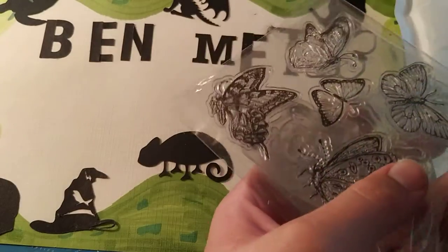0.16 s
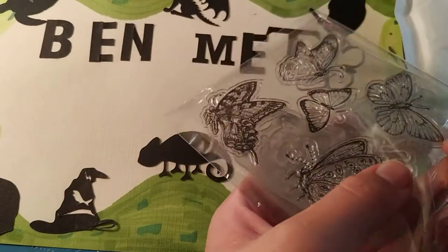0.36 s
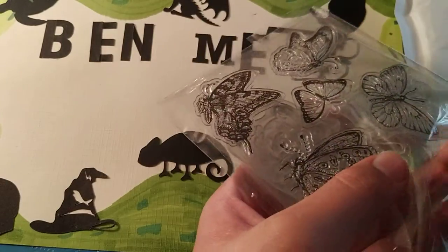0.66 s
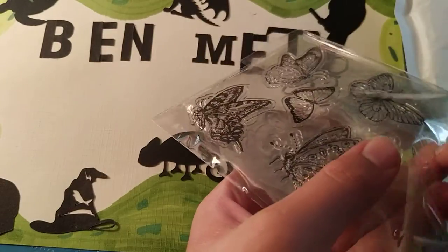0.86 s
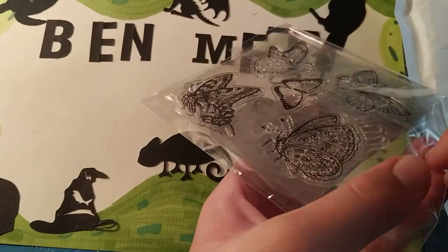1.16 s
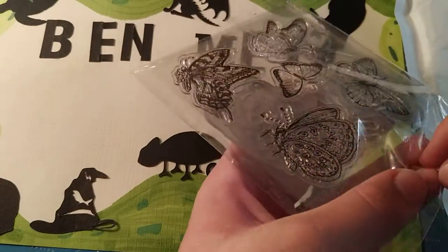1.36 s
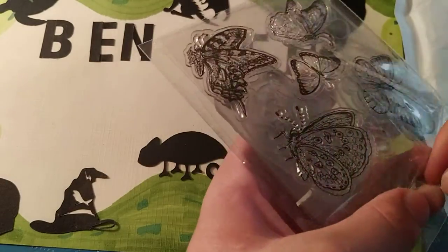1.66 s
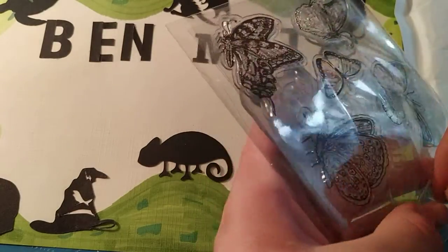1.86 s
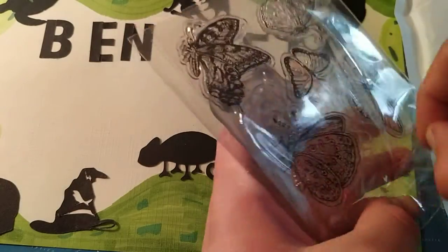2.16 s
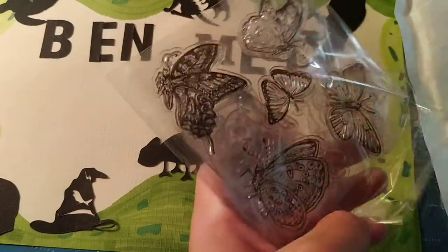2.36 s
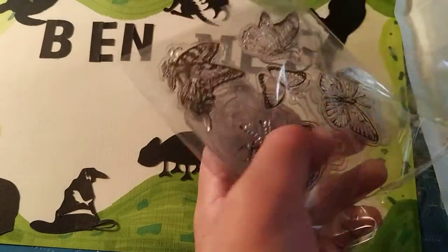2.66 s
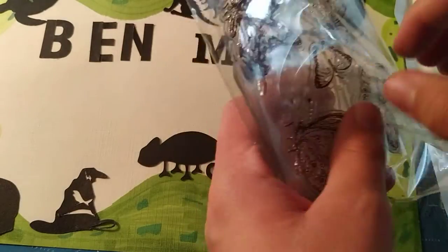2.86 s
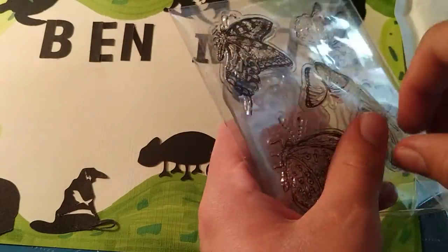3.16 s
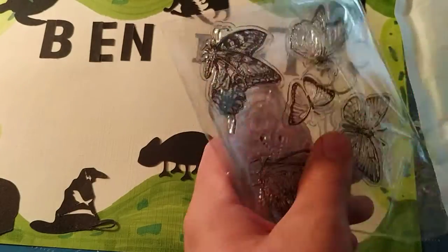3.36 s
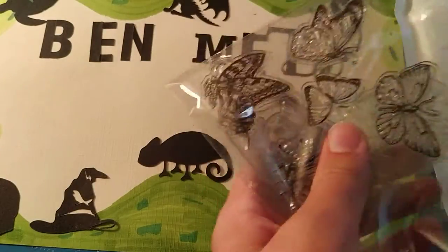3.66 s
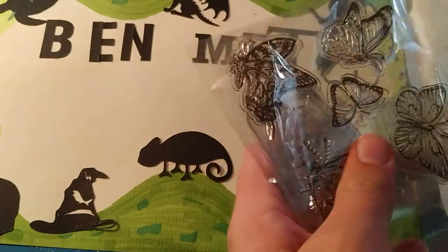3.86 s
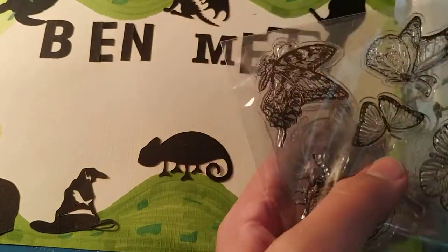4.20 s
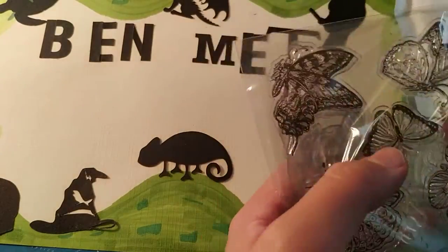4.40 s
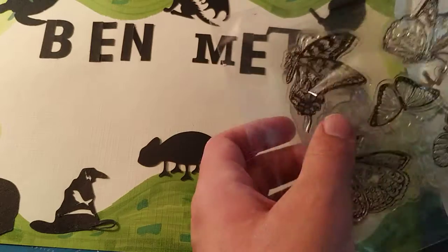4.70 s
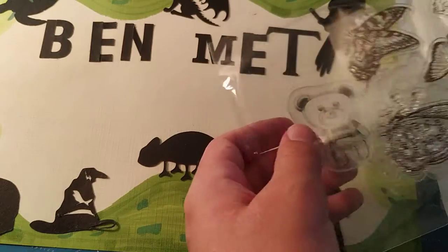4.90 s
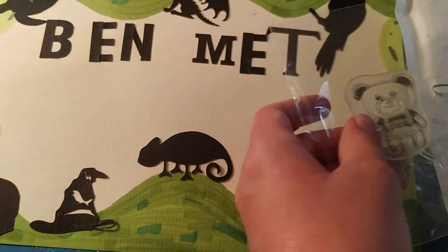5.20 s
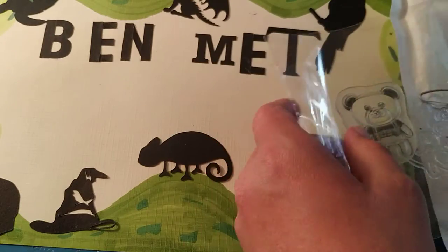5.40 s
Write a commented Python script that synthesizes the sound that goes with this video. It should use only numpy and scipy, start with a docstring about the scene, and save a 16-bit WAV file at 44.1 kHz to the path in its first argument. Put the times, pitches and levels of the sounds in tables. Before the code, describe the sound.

Close, bright crinkling comes from a plastic sleeve and the thin sheets inside it as they are handled. It starts with light, separate snaps, eases for a moment, then builds into a busy run of crackles and crunches, with hiss as the sheets slide. Fingers rustle and the bending plastic gives soft puffs of air before the crackle thins. The room is quiet, with only a short echo.

```python
"""Crinkling plastic sheets

Two hands flex thin clear sheets in a crisp sleeve, close under a two-port microphone in a quiet room.
Creases snap through as sharp clicks over fine crackle and dense crunches. The sheets hiss as they slide
and puff air as they flex; fingers rustle. Table and walls answer with early echoes and a short tail."""
import sys
import numpy as np
from scipy import signal
from scipy.fft import rfft, irfft
from scipy.io import wavfile

SR = 44100
rng = np.random.default_rng(int(sys.argv[2]) if len(sys.argv) > 2 else 0)


def log_audio(samples):
    """Write samples as a 16-bit WAV file to the path given in sys.argv[1]."""
    # one column per channel
    frames = np.atleast_2d(samples).T
    # limit to full scale, then quantise
    limited = np.clip(frames, -1, 1)
    pcm = np.round(limited * 32767).astype(np.int16)
    wavfile.write(sys.argv[1], SR, pcm)


N = 244346


def from_db(db):
    return 10 ** (np.asarray(db) / 20)


def unit_rms(x):
    return x / np.sqrt(np.mean(x ** 2) + 1e-20)


def butter(x, hz, kind, order=2):
    return signal.sosfilt(signal.butter(order, hz, kind, fs=SR, output="sos"), x)


def resonance(x, hz, width):
    """Two-pole band with gain 1 at its peak."""
    r = np.exp(-np.pi * width / SR)
    poles = [1, -2 * r * np.cos(2 * np.pi * hz / SR), r * r]
    return signal.lfilter(np.array([1, 0, -1]) * (1 - r * r) / 2, poles, x)


def panned(x, pan_db):
    """Two channels from a left-minus-right level gap."""
    return x * from_db(np.multiply.outer([.5, -.5], pan_db))


def place(rows, times, lead):
    """Lay each row on one track, starting `lead` samples before its time."""
    at = np.round(times * SR).astype(int) - lead + np.arange(rows.shape[1])
    track = np.zeros(N)
    np.add.at(track, np.clip(at, 0, N - 1), rows)
    return track


def fader(table, column):
    """Gain that rides one dB column of a table over time."""
    points = np.transpose(table)
    return from_db(np.interp(np.arange(N) / SR, points[0], points[column]))


# Room tone spectrum: (frequency [Hz], relative density [dB])
ROOM_TONE = [(20, 12.5), (40, 4.5), (100, -4), (250, -12.5), (900, -20), (3000, -22.5), (8000, -43),
             (16000, -51)]


def room_tone(level_db=-59, likeness=0.62, alike_below_hz=97):
    """Steady room noise, alike in both ports only in the bass."""
    hz = np.maximum(np.arange(N // 2 + 1) * SR / N, 1)
    points_hz, points_db = np.transpose(ROOM_TONE)
    shape = from_db(np.interp(np.log(hz), np.log(points_hz), points_db))
    alike = likeness / (1 + (hz / alike_below_hz) ** 2)
    mid, side = rfft(rng.standard_normal((2, N))) * shape
    both = np.sqrt(1 + alike) * mid + np.sqrt(1 - alike) * side * [[1], [-1]]
    return from_db(level_db) * unit_rms(irfft(both, N))


def room_tail(x, send_db=-14, t60_s=0.27):
    """The walls return a smooth tail, thin in the bass; each port hears its own."""
    t = np.arange(SR // 2) / SR
    tail = rng.standard_normal((2, len(t))) * from_db(-60 * t / t60_s) * np.minimum(t / 0.01, 1)
    tail = from_db(send_db) * unit_rms(tail) / np.sqrt(len(t))
    return signal.fftconvolve(x, butter(tail, 500, "high", order=1), axes=1)[:, :N]


# Weight of the shifting grip: (time [s], level [dB])
GRIP_RUMBLE = [(0.0, -92), (3.2, -84), (3.55, -60), (4.0, -58.5), (4.5, -61), (4.85, -63), (5.0, -67),
               (5.54, -58.5)]


def grip_rumble(friction, clumps):
    """Hands shifting their grip rumble below 90 Hz."""
    steadier = friction * from_db(-2.5 * clumps)
    return unit_rms(butter(steadier, [28, 90], "band")) * fader(GRIP_RUMBLE, 1)


# Faders of the handling bed, before trims: (time [s], crackle [dB], hiss [dB], rustle [dB])
HANDLING_BED = [(0.0, -43.5, -60.5, -61), (0.52, -67, -66, -68.5), (0.85, -48.5, -68, -65),
                (1.39, -91, -68.5, -68), (1.53, -79, -74.5, -90), (1.87, -59.5, -77, -87),
                (2.04, -52.5, -73, -77), (2.08, -40, -65, -78), (2.36, -35.5, -45, -55),
                (2.64, -40, -59.5, -69), (2.9, -43.5, -60, -58), (3.16, -45, -53, -61),
                (3.36, -41.5, -57, -64), (3.55, -32.5, -50, -51), (3.86, -48.5, -49, -52.5),
                (4.06, -39, -54.5, -51), (4.72, -48, -43.5, -54.5), (5.0, -38, -54, -58),
                (5.1, -44.5, -51, -67), (5.28, -40.5, -50.5, -56), (5.42, -60, -53, -54),
                (5.54, -65, -52, -59.5)]


def finger_rustle(friction, trim_db=-4):
    """Fingers rub the plastic with a low rustle."""
    return unit_rms(butter(friction, [120, 450], "band")) * fader(HANDLING_BED, 3) * from_db(trim_db)


def sliding_hiss(body_db=3):
    """Sheets slide over each other with a hiss; returns edge and body feeds."""
    hiss = rng.standard_normal((2, N)) * fader(HANDLING_BED, 2)
    return hiss, hiss[0] * from_db(body_db)


def crackle(clumps, base_per_s=900, spread_db=3, edge_db=-11, body_db=-12):
    """Countless small creases tick at random, in clumps; returns edge and body feeds."""
    fires = rng.random(N) < base_per_s * from_db(4 * clumps) / SR
    sizes = from_db(spread_db * np.minimum(rng.exponential(1, N), 4)) * rng.choice([-1, 1], N)
    ticks = unit_rms(fires * sizes) * fader(HANDLING_BED, 1)
    return panned(ticks * from_db(edge_db), rng.uniform(-12, 12, N)), ticks * from_db(body_db)


# Air shoved at the ports: (centre time [s], relative level [dB], pitch [Hz], half length [cycles])
AIR_PUFFS = [(0.196, -49.5, 288, 1.2), (0.953, -44, 330, 0.43), (1.036, -47, 183, 0.63),
             (2.36, -46.5, 308, 1.7), (2.39, -55, 140, 0.88), (2.748, -50, 221, 0.62),
             (2.863, -40.5, 210, 0.39), (3.386, -41, 278, 0.84), (3.43, -41, 240, 0.99),
             (3.604, -33, 76, 0.28), (3.712, -45.5, 97, 0.58), (3.788, -49, 55, 0.4),
             (3.91, -47, 129, 0.54), (3.956, -46, 205, 0.84), (4.028, -45.5, 86, 0.47),
             (4.1, -53, 70, 0.52), (4.135, -34, 70.6, 0.2), (4.259, -46, 59, 0.49), (4.373, -39, 65, 0.39),
             (4.505, -50.5, 111, 1.8), (4.554, -49, 236, 1.0), (4.731, -52, 204, 1.9),
             (4.779, -50.5, 50, 1.1), (4.853, -45, 60.6, 0.43), (5.344, -51, 60.4, 0.28),
             (5.428, -55.5, 206, 4.1)]


def air_puffs(trim_db=5, min_cycles=.3):
    """A flexing sheet shoves air: a soft swing that swells and sinks, quicker for a smaller flap."""
    times, level_db, hz, cycles = np.transpose(AIR_PUFFS)[:, :, None]
    turns = np.arange(-2000, 2000) / SR * hz
    swing = np.sin(2 * np.pi * turns) * np.exp(-2 * (turns / np.maximum(cycles, min_cycles)) ** 2)
    return place(swing * from_db(level_db + trim_db) * rng.choice([-1, 1], times.shape), times, 2000)


# Resonances of the sheets: (frequency [Hz], width [Hz], relative level [dB])
SHEET_MODES = [(814, 88, -3.5), (1263, 216, -2), (2070, 213, -3.5), (2565, 135, -0.5), (3250, 770, -8)]


def sheet_body(clicks, broad_db=-5):
    """The stiff sheets answer clicks broadly and with resonances, each struck with varying strength."""
    out = from_db(broad_db) * butter(clicks, [250, 5000], "band", order=1)
    block = np.arange(N) // 256
    for k, (hz, width, level_db) in enumerate(SHEET_MODES):
        strength = from_db(level_db + 11.5 + rng.uniform(-2.7, 1.5, N // 256 + 1))[block]
        out += (-1) ** k * resonance(clicks * strength, hz, width)
    return out


# Folds crushed in the grip: (centre time [s], half length [ms], relative level [dB])
CRUSHED_FOLDS = [(0.098, 14.5, -44.5), (0.778, 58, -55.5), (0.872, 23, -51.5), (1.07, 40, -55),
                 (2.362, 22, -56), (2.422, 34, -37), (2.681, 48, -43), (2.852, 35, -45), (3.129, 19, -45),
                 (3.419, 41, -42), (3.605, 39, -40), (3.71, 16, -37), (3.779, 5.6, -34.5), (4.03, 28, -37),
                 (4.138, 25.4, -36.5), (4.259, 7.6, -37), (4.377, 22, -40), (4.432, 5.5, -53),
                 (4.614, 15, -38), (4.68, 31, -44), (4.759, 6.6, -36), (4.907, 12.5, -50), (5.34, 60, -49)]


def crunches(ticks_per_s=6000, body_db=5.5):
    """Many tiny creases give way in one dense swell; returns edge and body feeds."""
    times, half_ms, level_db = np.transpose(CRUSHED_FOLDS)[:, :, None]
    ms = np.arange(-3000, 3000) * 1000 / SR
    swell = place(from_db(level_db) * np.exp(-2 * (ms / half_ms) ** 2), times, 3000)
    fires = rng.random((2, N)) < ticks_per_s / SR
    sizes = from_db(1.05 * rng.exponential(1, (2, N))) * rng.choice([-1, 1], (2, N))
    ticks = swell * unit_rms(fires * sizes)
    return ticks, ticks[0] * from_db(body_db)


def crease_slips(t, times, dice, pace, slips_per_s=4700, rise_db_per_ms=7, fade_db_per_ms=5.5):
    """Small slips gather, the crease lets go at t = 0, and more slips die away."""
    handling_db = np.interp(times, *np.transpose(HANDLING_BED)[:2])
    calm_db = np.minimum(handling_db + 40, 0)   # calmer hands, less creep
    creep_db = -2 + .5 * calm_db + rise_db_per_ms * pace[:, 0] * 1000 * t
    settle_db = -3 - fade_db_per_ms * pace[:, 1] * 1000 * t
    fires, sizes = dice[:, 0] < slips_per_s / SR, 2 * dice[:, 1] - 1
    slips = fires * sizes * from_db(np.where(t < 0, creep_db, settle_db))
    slips[:, t == 0] = .9 * np.sign(sizes[:, :1])   # the main release
    return slips / np.sqrt(np.sum(slips ** 2, axis=1, keepdims=True) / 2)   # same energy per snap


def spot_colour(count, taps=24, fade_db_per_tap=1.5):
    """Each spot on the film colours its snap with a short random echo pattern."""
    colour = rng.standard_normal((count, taps)) * from_db(-fade_db_per_tap * np.arange(taps))
    colour[:, 0] = 2   # direct sound
    treble = np.abs(rfft(colour, 64)[:, 9:17])   # 6 to 11 kHz, held at an even level
    return colour / np.sqrt(np.mean(treble ** 2, axis=1, keepdims=True))


# Featured creases, levels before trims: (time [s], edge level [dB], body level [dB],
# pitch of the buckling patch [Hz], ring over body [dB], left minus right [dB])
CREASE_SNAPS = [(0.0387, -9, -25.5, 3100, 6.5, -1.5), (0.082, -31, -44.5, 815, 9, -6),
                (0.106, -18.5, -42, 4500, 2, -3), (0.167, -21, -31, 855, -3, -4),
                (0.1799, -29, -66, 4460, -1, 0), (0.1929, -6.5, -24, 2170, 7.5, -2),
                (0.23, -23.5, -55, 1940, -3, -2), (0.2385, -27, -39.5, 4440, 11, 7),
                (0.324, -26.5, -35.5, 4030, 11, -6), (0.3957, -14.5, -34, 3730, 10, 0.5),
                (0.5788, -35, -39.5, 2600, -20, 8), (0.647, -53, -43, 1130, 5, -4),
                (0.675, -37, -46, 3830, 12, 1), (0.6795, -19.5, -46, 4300, -4, -5),
                (0.705, -34, -41.5, 2070, -21, -1), (0.7778, -22, -38, 2020, -9, -3),
                (0.7843, -27, -45, 2110, 1, -13), (0.8013, -19.5, -34, 3930, -1, 1),
                (0.8627, -29, -59, 2290, 3, -11), (0.873, -37, -54, 4350, -6, -17),
                (0.9405, -15.5, -26.5, 3430, -7, -3), (0.9534, -10, -23, 830, 0, 0),
                (1.0331, -14, -28.5, 1980, -4, -6), (1.056, -33, -32.5, 2030, 2, -6),
                (1.0824, -36, -33.5, 800, 1, 0), (1.159, -56, -42, 1980, 6, -3),
                (1.1942, -28.5, -42.5, 2730, -8, -2), (1.2415, -12.5, -38, 2020, 10, -4),
                (1.2568, -12.5, -25, 2500, 6, -4), (1.2684, -38, -55, 2280, 0, 3),
                (1.3084, -23.5, -36.5, 2000, 1, 0), (1.3549, -9.5, -31, 3700, -19, -5),
                (1.3646, -15, -31.5, 800, -1, -1), (1.4496, -26.5, -66, 2050, 2, -2),
                (1.464, -33, -49, 2210, 16, 2), (1.4898, -26, -47.5, 3860, 18, -5),
                (1.613, -60, -55.5, 1920, 11, 0), (1.727, -62, -47.5, 1250, 7, -3),
                (1.74, -38, -54, 3600, 0, 0), (1.842, -58, -52, 2000, 2, 0),
                (1.861, -27, -42, 3620, -2, -2), (1.8699, -7.5, -20.5, 2140, -24, -5),
                (1.8818, -27, -40, 1920, 9, 5), (1.914, -29, -30.5, 2100, 1, 1),
                (1.921, -25, -38, 810, -4, -4), (2.0545, -7, -21, 2920, -1, 3),
                (2.191, -23, -30, 2100, 6, 9), (2.2113, -17, -48, 3020, 2, -3),
                (2.219, -16, -23.5, 3300, 2, 3), (2.2545, -10, -34, 2120, 10, 5),
                (2.2656, -17.5, -27, 856, 4, -1), (2.2779, -1, -20, 2060, 7, 5.5),
                (2.2855, -30, -40, 3600, 16, 0), (2.3105, -18, -34, 2880, 17, -4),
                (2.3478, -19, -36, 4180, -5, 1), (2.3512, -2.5, -21, 3970, -2, 2.5),
                (2.3602, -31, -44, 3100, -2, 10), (2.3645, -17, -34, 3960, -2, 1),
                (2.369, -16, -27, 4440, -6, 13), (2.3868, -18, -34, 3940, 10, -7),
                (2.393, -2, -15, 3630, -13, 0), (2.406, -11, -29, 2390, -4, 10),
                (2.413, -6.5, -42, 2430, -5, -4), (2.4209, -11, -26.5, 820, -3, 6),
                (2.43, -10, -27, 4100, -8, 6), (2.432, -2, -32, 4000, -13, -1),
                (2.4448, -15, -31, 4050, -2, 5), (2.4674, -13, -27, 3030, -7, 1),
                (2.4819, -14.5, -36, 1970, 8, 5), (2.5399, -6, -22.5, 2740, 2, -6.5),
                (2.5934, -11, -20.5, 1200, -19, 5), (2.6032, -19, -27.5, 3820, 8, -3),
                (2.647, -17, -26, 3050, 4, -6), (2.648, -5.5, -17, 3000, -3, -6),
                (2.656, -30, -42, 3420, 0, 2), (2.661, -15, -32, 2580, -2, 12),
                (2.6847, -12.5, -27, 3660, 12, -9), (2.689, -1.5, -21, 3430, 8, 1),
                (2.6976, -18, -43, 2820, 4, 6), (2.7148, -5.5, -21, 2550, 3, -1),
                (2.7242, -9, -20.5, 2800, 1, -1), (2.7385, -15, -24, 2640, 4, 0),
                (2.7423, -8.5, -28, 2760, 6, -2), (2.752, -3.5, -20.5, 840, 1, -1),
                (2.761, -5.5, -16, 2710, -17, -3), (2.7818, -12, -31, 3510, 1, 1),
                (2.789, -4, -45, 3900, -4, -9), (2.818, -10, -24, 2060, 1, -1),
                (2.8535, -21, -53, 810, 2, -8), (2.8573, -26, -41, 810, 9.5, -11),
                (2.8659, -21, -46, 895, 15, -4), (2.921, -28.5, -39.5, 2010, 1, 11),
                (2.946, -21.5, -29.5, 1220, 3.5, -4), (2.9738, -21, -26.5, 4000, -10, -15),
                (2.9878, -7.5, -32, 3160, 15, 3), (3.0242, -33, -33, 2110, 9, -8),
                (3.054, -24, -46, 3160, 17, 3), (3.0691, -13.5, -23.5, 3200, 11, -2),
                (3.08, -21, -42, 3680, 5, -2), (3.0916, -16, -31, 3490, 8, -16),
                (3.1006, -9, -27, 3280, 10, 9), (3.1137, -6.5, -21, 2000, 4, -2),
                (3.121, -7.5, -24, 3380, -5, -4), (3.129, -12, -30, 3300, 2, 9),
                (3.1418, -7, -33, 3850, -9, -5), (3.1699, -13, -25, 3980, -6, -0.5),
                (3.2205, -27, -39, 2070, 8, 5), (3.2568, -26, -28, 1220, 6, 5),
                (3.3273, -8.5, -38, 3600, 1, -1), (3.3555, -4.5, -27, 2070, 4, 1),
                (3.3659, -15, -25.5, 4480, -14, 4), (3.3756, -9, -39, 3520, -5, 3),
                (3.3865, -4.5, -20, 1980, 4, -6), (3.3958, -22, -35, 3360, 6, -2),
                (3.4007, -6, -26, 3060, -7, 0), (3.412, -13, -26, 3380, 7, -2),
                (3.4305, -18, -27, 2040, 7, -1), (3.4404, -2.5, -20.5, 1450, 3, 3),
                (3.4691, -18, -49, 3490, 2, -4), (3.4942, -11.5, -48, 2930, -3, 3),
                (3.5102, -2, -23.5, 3480, 12, -6), (3.524, -14.5, -41, 3420, 3, -15),
                (3.54, -19, -34, 3360, 13, -17), (3.569, -19, -27.5, 1580, 10, -11),
                (3.575, -4, -23.5, 3100, -22, -3), (3.5865, -11, -40, 3530, -1, 6),
                (3.6002, -12, -30, 1720, 0, 3), (3.6076, -7, -29, 4160, -8, 2),
                (3.6129, -16, -23, 2440, -1, 5), (3.6165, -21, -24, 4030, -14, 16),
                (3.6224, -5, -32, 1330, 3, 1), (3.6359, -6, -44, 850, 15, -2.5),
                (3.646, -17, -42, 1400, 1, -15), (3.7032, -22, -28.5, 1200, 5, -11),
                (3.7126, -11, -32, 780, 5, 3), (3.734, -14.5, -32.5, 810, 13.5, 12),
                (3.74, -9, -26, 4300, -7, 0), (3.7497, -13, -32, 3270, 6, -6),
                (3.765, -18, -30, 3290, 13, 4), (3.7734, -11, -25, 864, 1, -1),
                (3.7787, -9, -41, 780, 7, 4), (3.7872, -19, -40, 3190, -6, 5),
                (3.8099, -6, -25, 3120, 13, -3.5), (3.825, -24, -40, 3470, -5, 8),
                (3.8601, -7.5, -29.5, 4300, -7, -2), (3.8767, -7.5, -30, 3550, 0, 1),
                (3.9391, -21.5, -20.5, 3820, -10, -12), (3.9535, -5.5, -25, 3460, -9, 1.5),
                (3.9783, -20, -33, 1510, 0, -11), (3.9934, -16, -29, 3480, -8, 2),
                (4.003, -23, -39, 2730, 2, -8), (4.021, -9, -43, 4410, -8, -5),
                (4.0304, -3, -21, 3530, -15, 2), (4.053, -6, -38, 3640, -6, -6),
                (4.0673, -19, -26, 850, -4, 8), (4.0902, -9, -23.5, 2050, 6, -1),
                (4.0984, -7, -18, 3100, -1, 4.5), (4.1335, -14, -28, 2930, -8, -7),
                (4.1366, -20, -29, 3570, -9, -6), (4.148, -13, -32, 3170, -6, 2),
                (4.1707, -6.5, -25, 4250, 3, 3), (4.216, -11, -37, 860, 8, -2.5),
                (4.2327, -19, -31, 820, 1, -3), (4.2475, -19, -27, 4250, 0, 1),
                (4.255, -6.5, -41, 3570, -1, -3), (4.258, -18, -43, 850, 15, 1),
                (4.2665, -6, -27, 3340, 15, 0), (4.317, -24, -26, 3550, -4, 2),
                (4.327, -3, -28, 4330, 21, -1), (4.3603, -34, -23.5, 853, 4, 0),
                (4.386, -12, -23, 3150, 1, -7), (4.389, -15.5, -21, 3260, 10, 10),
                (4.4055, -21, -25.5, 855, -8, -7), (4.4288, -14, -48, 4310, 3, 6),
                (4.434, -21.5, -34, 3070, 15, -16), (4.4525, -13, -33, 2670, 6, 6),
                (4.4696, -11.5, -27, 4300, 13, 1), (4.478, -25, -30, 4000, 11, -6),
                (4.51, -13, -29.5, 3400, 6, -4), (4.526, -22, -24, 2760, 8, -10),
                (4.53, -4, -26.5, 2770, 11, -2), (4.557, -16, -28.5, 3240, 12, -1),
                (4.59, -12.5, -22, 890, -10, 0), (4.6122, -14.5, -39, 2180, -5, 4),
                (4.6168, -16, -33, 2130, -2, -2), (4.622, -22, -39, 2700, 1, -3),
                (4.644, -12.5, -42, 2930, 0, -2), (4.6487, -7, -34, 3500, 19, 3),
                (4.6642, -7.5, -26.5, 2750, 17.5, -2), (4.686, -21, -37, 3470, -4, -2),
                (4.6925, -15.5, -38, 2050, 2, 5), (4.7432, -9.5, -26, 3480, 16, 1.5),
                (4.755, -15, -37, 3250, -4, -2), (4.763, -28, -31, 3760, 13, 0),
                (4.7971, -25, -21.5, 2030, -4, -2), (4.818, -10.5, -28, 2630, 12, 0),
                (4.8479, -18, -18, 3360, -1, -1), (4.8887, -5, -36.5, 905, 10, 5),
                (4.8943, -5, -40, 4200, -7, 0), (4.8976, -25, -27, 3640, -7, -2),
                (4.907, -18, -31, 3620, 8, -1), (4.9162, -19, -36, 3940, 11, -6),
                (4.9265, -12, -27, 3340, 10.5, -6.5), (4.9377, -17, -34, 3700, 4, 0),
                (5.0423, -9, -23, 1880, 9, 2), (5.0473, -17, -29, 3100, 1, 2),
                (5.076, -19.5, -40, 1300, 9, -2), (5.152, -30, -54, 1360, 5, -5),
                (5.212, -36, -53, 2080, 19, 1), (5.332, -11.5, -34, 3270, 11, 1.5),
                (5.349, -20.5, -45, 4180, -5, 7), (5.3627, -28, -36, 880, -1, 5),
                (5.39, -28, -39, 3960, 2, -9), (5.4355, -16, -28.5, 1900, 2, -2),
                (5.4772, -7, -21.5, 3140, 4.5, -2)]


def crease_snaps(edge_trim_db=2, body_trim_db=12, ring_trim_db=-6.5, echo_db=-26, echo_t60_s=0.046):
    """A crease snaps through and the patch around it rings; returns edge, body and ring feeds."""
    times, edge_db, body_db, patch_hz, ring_db, pan_db = np.transpose(CREASE_SNAPS)[:, :, None]
    lead, length = 300, 1400   # samples
    t = (np.arange(length) - lead) / SR
    after = np.maximum(t, 0)
    dice = rng.random((len(times), 2, length))
    scatter = rng.standard_normal(dice.shape)
    slips = crease_slips(t, times, dice, pace=np.exp(0.3 * scatter[:, :, :1]))
    # Early echoes off hands and table, new for every snap and port.
    echoes = scatter * from_db(echo_db - 60 * after / echo_t60_s) * np.minimum(after / 0.0018, 1)
    dullness = 0.092 + 0.25 * (2 * dice[:, 0, :1] - 1)   # snaps range from bright to dull
    colour = spot_colour(len(times))
    edge = np.zeros((2, N))
    for side, gains in enumerate(panned(from_db(edge_db + edge_trim_db), pan_db)):
        clicks = signal.fftconvolve(slips + echoes[:, side], colour, axes=1)[:, :length]
        edge[side] = place((clicks + dullness * np.roll(clicks, 1, axis=1)) * gains, times, lead)
    body = (slips + echoes[:, 0]) * from_db(body_db + body_trim_db)
    decay_db = -60 * after * patch_hz / 26   # rings for 26 cycles: small, high patches die sooner
    ring = np.sin(2 * np.pi * patch_hz * after) * from_db(body_db + ring_db + ring_trim_db + decay_db)
    return edge, place(body, times, lead), place(ring, times, lead)


def scene(body_pan_db=-4.5, cut_hz=14300):
    """Mix the bright edges and the body of the plastic into the room."""
    snap_edge, snap_body, ring = crease_snaps()
    clumps = unit_rms(butter(rng.standard_normal(N), 49, "low"))
    tick_edge, tick_body = crackle(clumps)
    hiss_edge, hiss_body = sliding_hiss()
    friction = rng.standard_normal(N) + from_db(-5) * rng.standard_normal((2, N))   # shared + per port
    friction *= from_db(3.5 * clumps)
    hands = finger_rustle(friction) + grip_rumble(friction, clumps)
    crunch_edge, crunch_body = crunches()
    # The crackling spot wanders, nearer the right port, so the left hears it late.
    wander = unit_rms(butter(rng.standard_normal(N), 25, "low"))
    left_lag = np.round((.00021 + .00011 * wander) * SR).astype(int)
    arrival = np.clip(np.arange(N) - left_lag * [[1], [0]], 0, N - 1)
    edges = np.take_along_axis(snap_edge + tick_edge + hiss_edge + crunch_edge, arrival, axis=1)
    edges = butter(edges, 4150, "high")   # thin film radiates mostly treble
    body = sheet_body((snap_body + tick_body + hiss_body + crunch_body)[arrival])
    lows = panned(body + (ring + air_puffs())[arrival] + hands, np.full(N, body_pan_db))
    mix = edges + lows + room_tail(edges + from_db(-0.5) * lows) + room_tone()
    # The mix is cut steeply at 14.3 kHz; a faint band above the cut is let through during snaps.
    top_band = butter(np.take_along_axis(snap_edge, arrival, axis=1), cut_hz, "high", order=8)
    return butter(mix, cut_hz, "low", order=40) + from_db(-13) * top_band


# Microphone port resonances, left then right: (frequency [Hz], width [Hz], gain [dB])
MIC_PORTS = [(9560, 1180, 20), (8150, 1030, 19)]


def record(dry, roll_off_hz=14900, cutoff_hz=16600):
    """Each port lifts the treble at its own resonance; peaks are rounded; the top rolls off and is cut."""
    ports = np.array([x + from_db(db) * resonance(x, hz, width)
                      for x, (hz, width, db) in zip(dry, MIC_PORTS)])
    rounded = butter(.8 * np.tanh(ports / .8), roll_off_hz, "low", order=11)
    return signal.sosfilt(signal.cheby2(20, 50, cutoff_hz, fs=SR, output="sos"), rounded)


dry = scene()
out = record(dry)
log_audio(out)
```